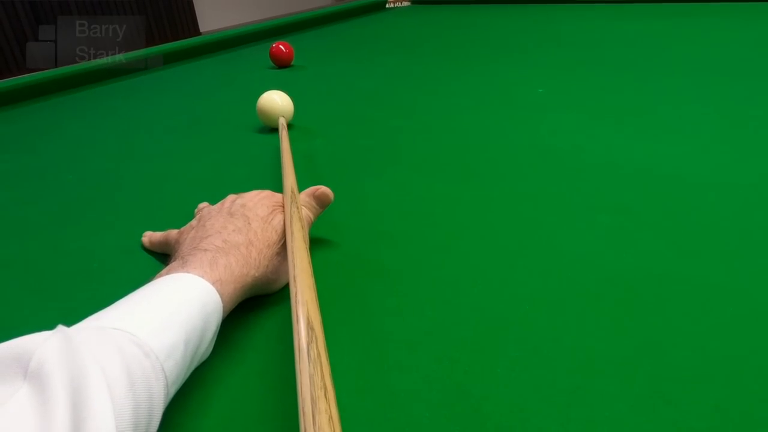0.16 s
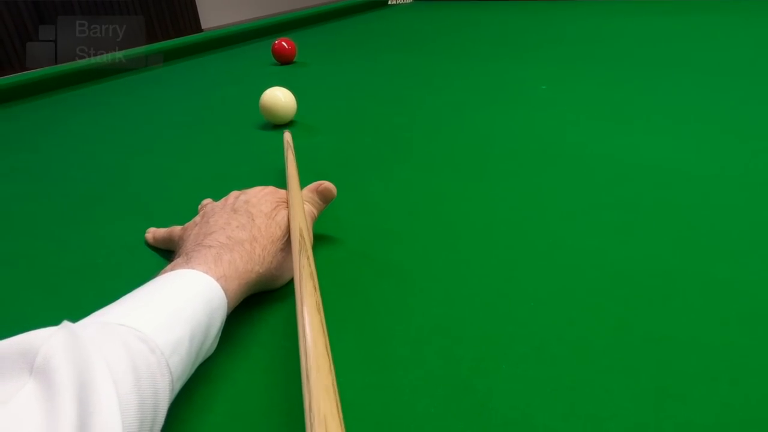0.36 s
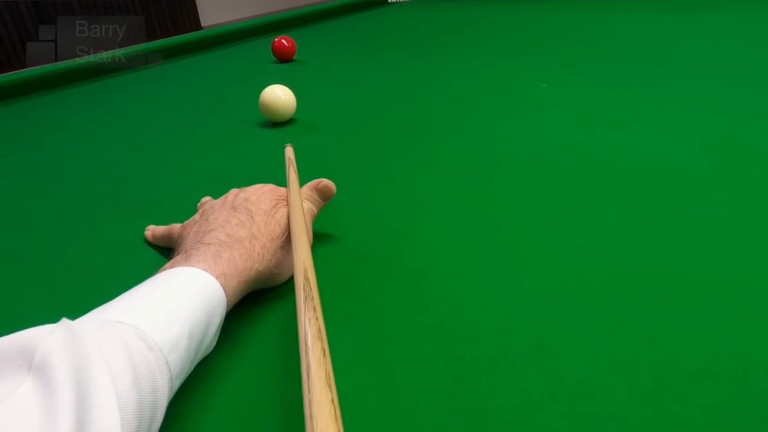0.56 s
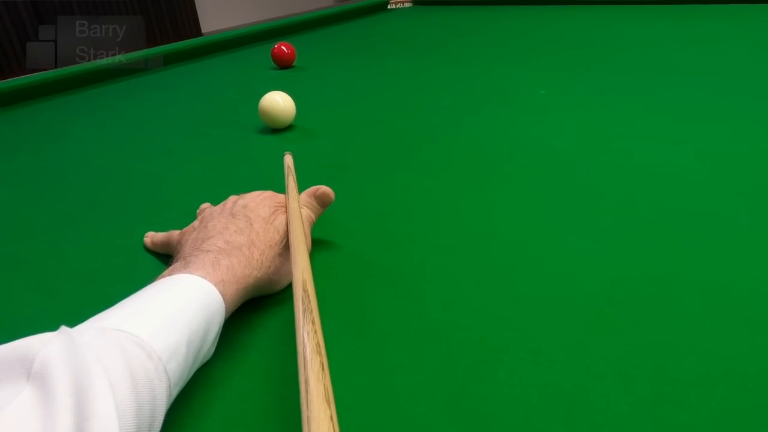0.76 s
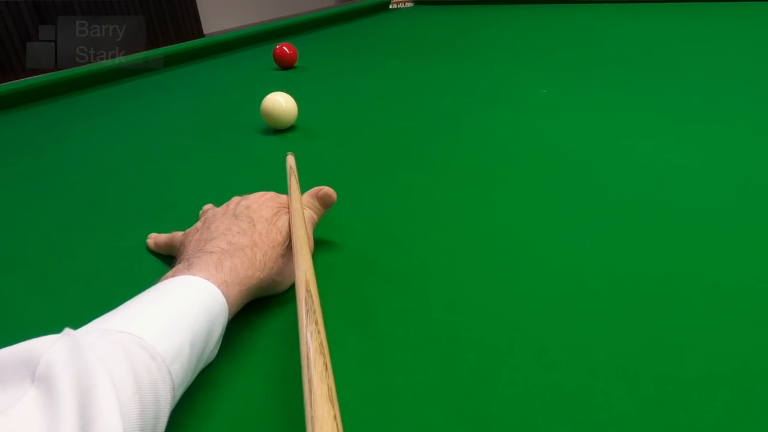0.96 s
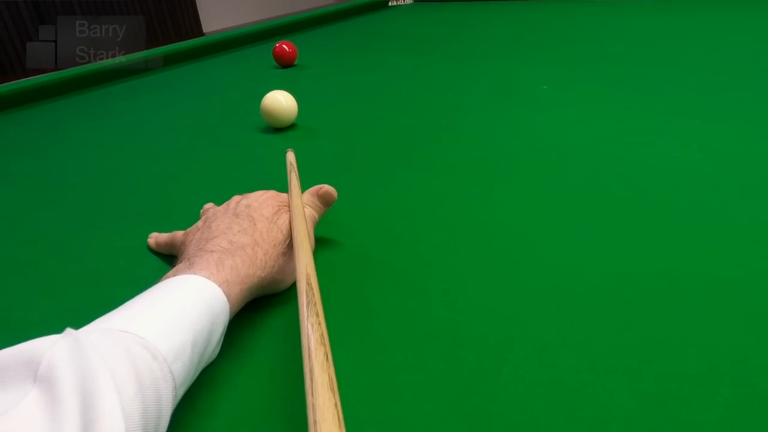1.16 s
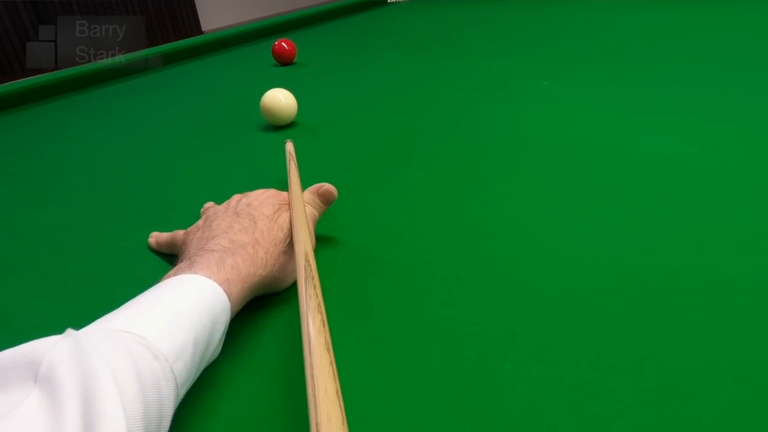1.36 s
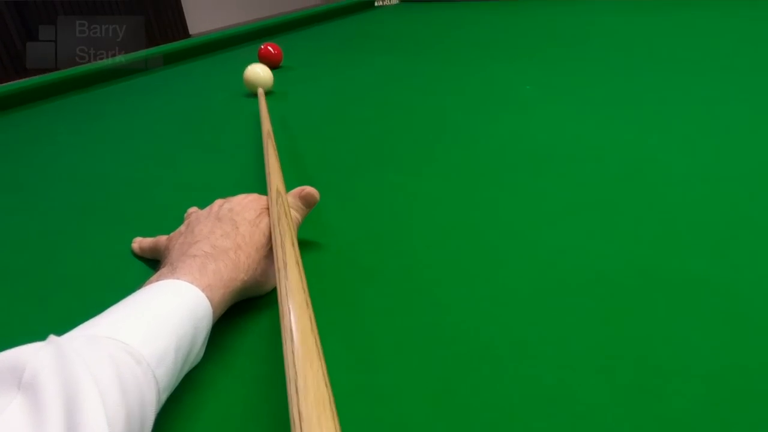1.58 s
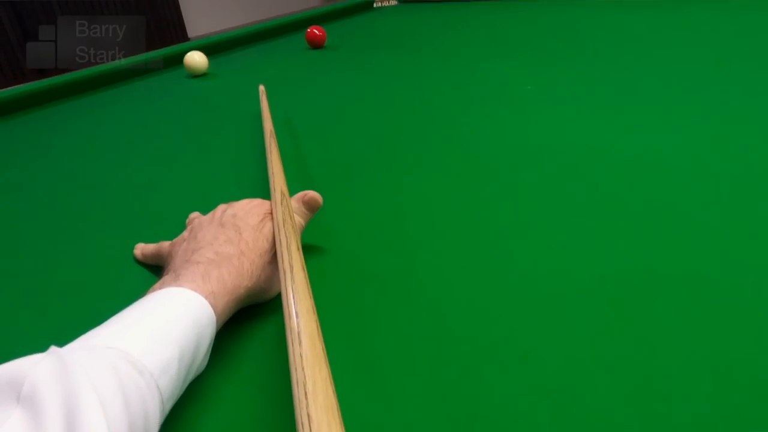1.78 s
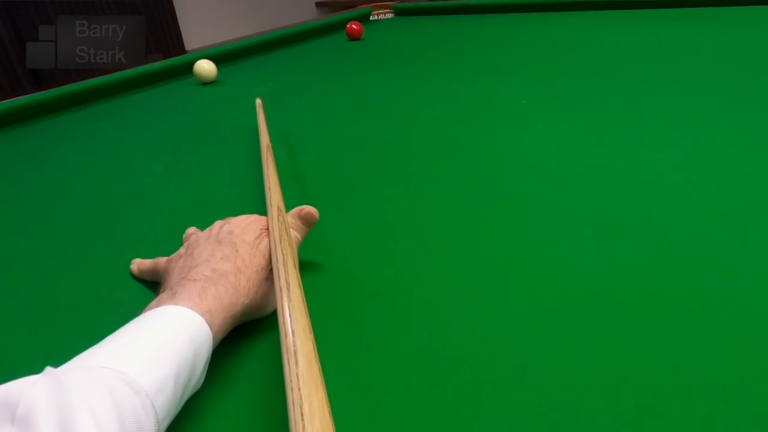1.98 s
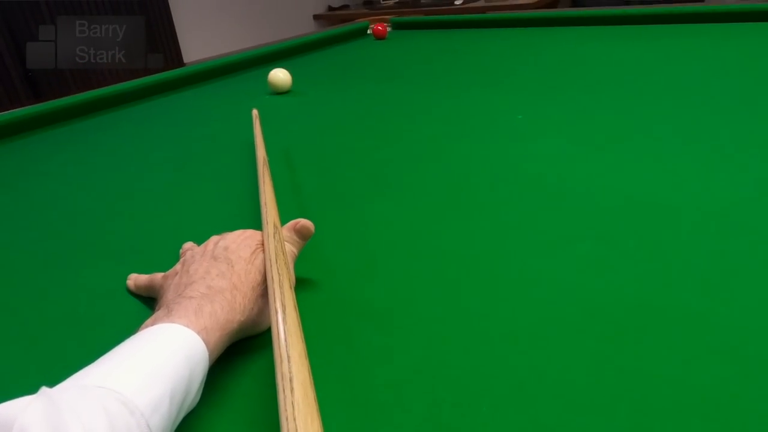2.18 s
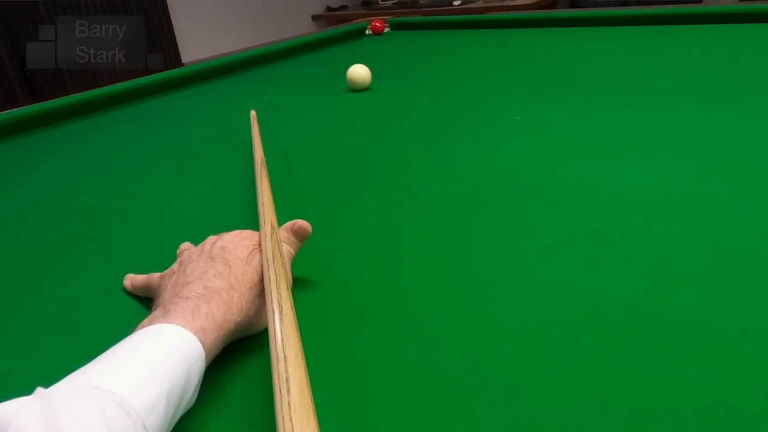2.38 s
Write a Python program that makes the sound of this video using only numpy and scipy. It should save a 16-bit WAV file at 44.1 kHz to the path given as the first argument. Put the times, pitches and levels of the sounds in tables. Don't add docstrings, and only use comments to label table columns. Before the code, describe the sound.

A snooker shot in a large, quiet room: faint ventilation and cue sliding, a woody tip strike and hand slap, then a much louder hard ball click with echoes, low rolling and a dull pocket thud, heard close.

```python
import sys
import numpy as np
from scipy import signal
from scipy.io import wavfile
from scipy.ndimage import uniform_filter1d

SR = 44100
rng = np.random.default_rng(int(sys.argv[2]) if len(sys.argv) > 2 else 0)


def dump_mix(stems):
    frames = np.atleast_2d(stems).T
    limited = np.clip(frames, -1, 1)
    pcm = np.round(limited * 32767).astype(np.int16)
    wavfile.write(sys.argv[1], SR, pcm)


def invert_db(x):
    u = np.asarray(x, float) / 20
    return 10 ** u


N = 107295
T = np.arange(N) / SR
ROOM_DELAY_S = 0.0105

# [start_s, level_db, slap_share_0_to_1, left_lag_samples]
CUE_SOUNDS = [(1.532, -64, 0.3, 0.96), (1.5418, -47, 0.3, 1.7), (1.5523, -36, 0.15, 3.8),
              (1.5629, -17.5, 0.05, 1.66), (1.5649, -32.5, 0.2, 0.74), (1.583, -53.5, 0.5, 0.5),
              (1.5927, -17, 0.84, 0.12), (1.5933, -12.5, 0.95, 0.1), (1.5955, -23, 0.8, 0.105),
              (1.6225, -35.5, 1, 0.057), (1.643, -47.5, 0.8, 0.1)]
# [start_s, level_db, ring_hz, t60_s, left_lag_samples]
BALL_CLICKS = [
    (1.71742, 4.5, 2800, .0014, 0.1),
    (1.71788, -9, 1150, .005, 0.1),
    (1.71917, 2.6, 2450, .0036, 2.2),
    (1.7194, -14, 1200, .004, 2.2),
]
# [start_s, level_db, t60_s, top_hz]
RUSTLES = [
    (1.598, -30, 0.63, 800),
    (2.202, -49.5, 0.73, 730),
    (2.387, -51.5, 0.42, 540),
]
# [start_s, dip_db]
GAIN_DIPS = [
    (1.561, -2),
    (1.593, 5),
    (1.717, 10.5),
]


def rms_one(x):
    return x / np.sqrt(np.mean(x ** 2) + 1e-20)


def at_hz(points, hz):
    points = np.array(points)
    return np.interp(np.log(hz), np.log(points[:, 0]), points[:, 1])


def butter(x, hz, kind, order=2):
    return signal.sosfilt(signal.butter(order, hz, kind, fs=SR, output="sos"), x)


def drift(rate):
    r = np.exp(-80 * np.pi * rate / SR)
    chance = rng.standard_normal(N // 40 + 2002)
    slow = signal.lfilter([1], [1, -2 * r, r * r], chance)[2000:]
    return np.interp(np.arange(N) / 40, np.arange(len(slow)), rms_one(slow))


def tap(s, lag=0.):
    out = np.full((2, N), 1e-18)
    k = np.arange(-8, 9)
    for ch, at in enumerate([s * SR + lag, s * SR]):
        out[ch, int(at) + k] = np.sinc(k - at % 1) * np.hanning(19)[1:-1]
    return out


def ring(push, hz, t60):
    r = invert_db(-60 / (t60 * SR))
    w = 2 * np.pi * hz / SR
    return signal.lfilter([0, np.sin(w)], [1, -2 * r * np.cos(w), r * r], push)


def squeeze(push, hz, t60):
    return np.diff(ring(push, hz, t60), prepend=0) * SR / (2 * np.pi * hz)


def bands(spectrum, likeness, shape):
    out, power = 0, 0
    edges = 32 * 2 ** np.arange(0, 9.3, .4)
    white = rng.standard_normal((2, 2, N))
    for k, (low, high) in enumerate(zip(edges, edges[1:])):
        mid, side = butter(white[k % 2], [low, high], "band")
        hz = np.sqrt(low * high)
        alike = np.clip(at_hz(likeness, hz), 0, .999)
        gain = invert_db(at_hz(spectrum, hz))
        power += gain ** 2 * (high - low) * 2 / SR
        stereo = np.sqrt(1 + alike) * mid + np.sqrt(1 - alike) * side * [[1], [-1]]
        out = out + gain * shape(hz) * stereo
    return out / np.sqrt(2 * power)


def duck_db():
    release_db_per_s = 66
    dips = [np.maximum(db - release_db_per_s * (T - s), 0) * (T > s) for s, db in GAIN_DIPS]
    return -uniform_filter1d(np.max(dips, axis=0), size=200)


def air():
    # [time_s, pitch_hz, level_db]
    throb_path = [(0.0, 24.9, -51), (0.13, 25.1, -51), (0.35, 24.9, -58), (0.431, 25.1, -75),
                  (0.55, 25.27, -53.5), (0.72, 24.8, -52.5), (1.001, 24.52, -63.5), (1.26, 25.4, -56.5),
                  (1.369, 24.94, -63), (1.66, 25.4, -51), (1.68, 24.9, -67), (1.77, 24.9, -45.5),
                  (1.81, 24.6, -58.5), (2.43, 24.5, -63)]
    # [pitch_hz, level_db_per_hz]
    air_colour = [(21, -27), (35, -8), (65, -23), (136, -31.5), (205, -22), (342, -29.5), (431, -36),
                  (1400, -42.5), (16000, -59)]
    # [pitch_hz, likeness_0_to_1]
    air_likeness = [(60, 0.92), (240, 0.078), (950, 0.63), (3770, 0.54), (15000, 0.886)]
    s, hz, db = np.transpose(throb_path)
    phase = 2 * np.pi * np.cumsum(np.interp(T, s, hz)) / SR
    throb = np.sqrt(2) * invert_db(np.interp(T, s, db)) * np.sin(phase - 1.0)
    noise = invert_db(-61.5) * bands(air_colour, air_likeness, lambda hz: invert_db(0.65 * drift(4.9)))
    return throb + noise * invert_db(0.4 * duck_db())


def slide():
    # [time_s, level_db, centre_hz]
    slide_path = [(0, -79, 4970), (.35, -73, 5020), (.65, -82, 5040), (.95, -73.5, 5590),
                  (1.2, -84.5, 4980), (1.45, -79.5, 4810), (1.58, -66, 5000), (1.61, -87, 5500),
                  (1.65, -62.5, 5970), (1.75, -82, 5930), (2.0, -75.5, 6210), (2.201, -72, 5820),
                  (2.288, -66.5, 5174), (2.362, -69, 4560), (2.43, -68, 5210)]
    # [multiple_of_centre, level_db]
    resonances = [(0.679, -1), (1.002, 1), (1.35, -10)]
    draw_back_s, width_hz = 2.02, 420
    s, db, hz = np.transpose(slide_path)
    phase = 2 * np.pi * np.cumsum(np.interp(T, s, hz)) / SR
    out = invert_db(-1) * rms_one(butter(rng.standard_normal(N), [3500, 9500], "band"))
    clear = np.clip((T - draw_back_s) / 0.13, .35, 1)
    for k, band_db in resonances:
        a, b = butter(rng.standard_normal((2, N)), width_hz, "low")
        hum = rms_one(a * np.cos(k * phase) + b * np.sin(k * phase))
        out = out + invert_db(band_db) * clear * hum
    return invert_db(np.interp(T, s, db) + 1.34 * drift(9.8)) * out


def ticks():
    # [start_s, level_db, pitch_hz, t60_s]
    tick_list = [
        (0.106, -52, 3680, 0.015),
        (.17, -59.5, 810, 0.023),
        (.542, -59, 750, 0.015),
        (2.2035, -52, 1400, 0.02),
        (.316, -60, 420, .03),
        (1.5828, -50, 6500, 0.004),
    ]
    out = 0
    for s, db, hz, t60 in tick_list:
        out = out + invert_db(db + 0.5) * butter(ring(tap(s), hz, t60), [hz / 1.2, hz * 1.18], "band")
    return out


def thrust():
    # [pitch_hz, level_db]
    sing_modes = [(4490, -85), (5050, -85), (5560, -89), (7870, -94), (8570, -89)]
    start_s, rise_s, t60_s = 1.37, 0.1, 0.02
    sing = sum(invert_db(db) * rms_one(ring(rng.standard_normal(N), hz, t60_s)) for hz, db in sing_modes)
    return sing * np.clip((T - start_s) / rise_s, 0, 1) * (T < CUE_SOUNDS[3][0])


def cue():
    # [pitch_hz, tip_strike_db, slap_db, t60_s]
    shaft_modes = [(172, 2.5, -43, 0.026), (235.5, -15, -27, 0.36), (654, -5.5, 6.5, 0.012),
                   (872.6, -7.5, 4.5, 0.037), (1168, 4, -6.5, 0.035), (1625, -10, -31, 0.067),
                   (1985, -15, -12.5, 0.031), (2368, 7.5, -5, 0.024), (2610, -8.5, -5.5, 0.067),
                   (2903, 6, -21.5, 0.021), (3392, -0.5, -9, 0.038), (3886, 0.5, -4.5, 0.025),
                   (4570, 1, -27.5, 0.026), (4917, -5, -18.5, 0.02)]
    crack_db, crack_s, crack_low_hz, slap_crack_db = -16, 0.0028, 4430, -4
    taps = [tap(s, lag) for s, _, _, lag in CUE_SOUNDS]
    out = np.zeros((2, N))
    for k, (hz, tip_db, slap_db, t60) in enumerate(shaft_modes):
        drive = 0
        for contact, (_, db, share, _) in zip(taps, CUE_SOUNDS):
            drive = drive + contact * invert_db(db + tip_db + share * (slap_db - tip_db))
        out += ring(drive, hz, t60) * (-1) ** k
    sparks = sum(np.abs(tap(s)) * invert_db(db + share * slap_crack_db) for s, db, share, _ in CUE_SOUNDS[3:])
    burst = signal.lfilter([1], [1, -np.exp(-1 / (crack_s * SR))], sparks)
    grit = rng.standard_normal(N) + 0.47 * rng.standard_normal((2, N))
    crack = butter(butter(burst * grit, crack_low_hz, "high"), 7270, "low", order=3)
    return butter(out, 8100, "low") + invert_db(crack_db) * crack


def hit_tail():
    # [start_s, tail_start_db]
    heard_hits = [
        (1.561, -41.5),
        (1.594, -52),
        (1.719, -22),
    ]
    # [pitch_hz, t60_s]
    room_decay = [(150, 0.99), (600, 0.64), (1500, 0.71), (3000, 0.77), (5000, 0.29), (9000, .3)]
    # [pitch_hz, level_db_per_hz]
    room_colour = [(200, -11), (500, -6), (900, -1.5), (1500, 8), (2400, 8.5), (3500, 4), (4500, -43),
                   (6000, -43)]
    # [pitch_hz, likeness_0_to_1]
    room_likeness = [(60, 0.66), (240, 1), (950, 0.9), (3770, 0.3), (15000, 0.76)]
    rise_s, pan_db, airy_db, airy_t60_s = 0.0018, 1.24, -56, 0.4
    ages = [(np.maximum(T - s - ROOM_DELAY_S, 0), db) for s, db in heard_hits]

    def tail(hz):
        t60 = at_hz(room_decay, hz)
        return sum((1 - np.exp(-a / rise_s)) * invert_db(db - 60 * a / t60) for a, db in ages)

    clack = butter(bands(room_colour, room_likeness, tail), 4010, "low", order=4)
    clack = clack * invert_db([[pan_db], [-pan_db]]) * invert_db(0.82 * drift(66.7))
    late = ages[-1][0]
    airy = rms_one(butter(butter(rng.standard_normal(N), 8450, "low", order=1), 4500, "high"))
    fade = invert_db(airy_db - 60 * late / airy_t60_s) * (late > 0)
    return clack + fade * airy * invert_db(2.0 * drift(39.7))


def room(shaft):
    cue_db, cue_t60_s, cue_top_hz = -11, 0.69, 4260
    age = np.maximum(T[:SR] - ROOM_DELAY_S, 0)
    echoes = rng.standard_normal(SR) + 0.13 * rng.standard_normal((2, SR))
    echoes = echoes * invert_db(-60 * age / cue_t60_s) * (age > 0)
    echoes = echoes / np.sqrt(np.sum(echoes ** 2) / 2)
    dull_cue = butter(shaft, cue_top_hz, "low", order=3)
    cue_tail = signal.fftconvolve(dull_cue, echoes, axes=1)[:, :N]
    return (hit_tail() + invert_db(cue_db) * cue_tail) * invert_db(duck_db())


def thuds():
    # [pitch_hz, level_db, t60_s]
    frame_modes = [(57.1, -4, 0.16), (88.3, -9, 0.12), (136.1, -9.5, 0.29), (175.3, -7.5, 0.17),
                   (224.7, -3.5, 0.16), (330, -5.5, 0.056), (463.4, -6, 0.049), (644, -12.5, 0.067)]
    # [start_s, level_db, softness_hz]
    blows = [(1.565, -22.5, 500), (1.592, -27.5, 500), (1.628, -31.5, 403), (1.738, -30.5, 302),
             (1.799, -34, 205), (1.891, -30.5, 125), (1.946, -28, 154), (1.976, -28.5, 194),
             (2.007, -51, 200), (2.051, -38.5, 280), (2.092, -40, 271), (2.2091, -37, 596),
             (2.251, -43, 404), (2.28, -41.5, 400), (2.322, -40, 302), (2.385, -40, 280),
             (2.399, -37.5, 240)]
    luck_db = rng.normal(0, 2.5, (len(blows), len(frame_modes)))
    luck_db[np.array(blows)[:, 0] > RUSTLES[1][0], :2] += -6.5
    pushes = [butter(tap(s)[0], soft_hz, "low") * invert_db(db) for s, db, soft_hz in blows]
    out = 0
    for k, (hz, db, t60) in enumerate(frame_modes):
        drive = sum(p * invert_db(g) for p, g in zip(pushes, luck_db[:, k]))
        out = out + ring(drive, hz, t60) * invert_db(db) * (-1) ** k
    return out


def knocks():
    # [start_s, level_db, pitch_hz, t60_s]
    knock_list = [(2.208, -36, 190, 0.14), (2.25, -39.5, 196.5, 0.28), (2.386, -33.5, 175, 0.23),
                  (1.626, -27.5, 221, 0.35), (1.6, -37.5, 221, 1), (1.88, -40.5, 221, 0.4),
                  (1.596, -36, 95, 0.47), (2.4, -38.5, 110, 0.54), (1.6, -38, 135, 0.3),
                  (1.955, -41, 54.4, 0.61), (2.21, -48, 490, 0.43), (2.209, -49, 740, 0.15),
                  (2.30, -50.5, 460, 0.28), (2.0, -39.5, 175, 0.3)]
    return sum(invert_db(db) * butter(ring(tap(s)[0], hz, t60), 2 * hz, "low") for s, db, hz, t60 in knock_list)


def rustle():
    out = 0
    for s, db, t60, top_hz in RUSTLES:
        age = np.maximum(T - s, 0)
        noise = rms_one(butter(butter(rng.standard_normal(N), top_hz, "low"), 130.3, "high"))
        out = out + noise * invert_db(db - 60 * age / t60) * (1 - np.exp(-age / 0.0021))
    return out


def rolling():
    start_s, start_db, loss_db_per_s, top_hz = 1.637, -37, 29.5, 222
    rumble = rms_one(butter(butter(rng.standard_normal(N), top_hz, "low"), 50, "high"))
    rumble = rumble * invert_db(1.2 * drift(15))
    fade_in = np.clip((T - start_s) / 0.0573, 0, 1)
    return rumble * invert_db(start_db - loss_db_per_s * (T - start_s)) * fade_in


def frame():
    out = thuds() + knocks() + rolling() + rustle()
    late = np.roll(butter(out, 240, "high", order=1), 300)
    return butter(out + 0.088 * late * np.array([[1], [-1]]), 30, "high")


def shaking():
    # [start_s, level_db, t60_s]
    late_rings = [(1.628, -31, 0.22), (1.60, -45.5, 1), (1.62, -41.5, 0.86), (1.60, -44, 0.39),
                  (1.605, -49.5, 0.96), (1.605, -35.5, 0.5), (1.64, -52, 0.6), (1.64, -44.5, 0.6),
                  (1.61, -60, 0.4), (1.66, -41.5, 0.56), (1.67, -40.5, 0.406), (1.615, -35, 0.15)]
    late_pitches = [2360, 2945, 2680, 1990, 3850, 1150, 3385, 1372, 4540, 980, 2360, 885]
    shake_t60_s, pan_db = 0.2, 1.1
    count = len(late_rings)
    shake = rng.standard_normal((count, 1, N)) + 0.6 * rng.standard_normal((count, 1, N)) * [[1], [-1]]
    out = 0
    for push, hz, (s, db, t60) in zip(shake, late_pitches, late_rings):
        fade = invert_db(-60 * np.maximum(T - s, 0) / t60) * np.clip((T - s) / 0.0036, 0, 1)
        out = out + invert_db(db) * rms_one(ring(push, hz, shake_t60_s)) * fade
    return out * (T < GAIN_DIPS[-1][0]) * invert_db([[pan_db], [-pan_db]])


def skid():
    middle_s, spread_s, skid_db = 1.648, 0.026, -65
    hiss = rms_one(butter(rng.standard_normal(N), [4800, 8500], "band", order=1))
    return invert_db(skid_db) * hiss * np.exp(-.5 * ((T - middle_s) / spread_s) ** 2)


def balls():
    click_db, soft_hz, snap_db, snap_pan_db = 0.27, 3270, -19, -1.5
    click = sum(invert_db(db) * squeeze(tap(s, lag), hz, t60) for s, db, hz, t60, lag in BALL_CLICKS)
    click = butter(butter(click, soft_hz, "low"), 6480, "low", order=1)
    snap = butter(sum(tap(s, lag) for s, _, _, _, lag in BALL_CLICKS[::2]), 7000, "high")
    return invert_db(click_db) * click + snap * invert_db(snap_db) * invert_db([[snap_pan_db], [-snap_pan_db]])


def walls():
    # [start_s, level_db, left_lag_samples]
    wall_echoes = [(1.7236, -24.5, 1.5), (1.7268, -23, 0), (1.7312, -24, 1), (1.7345, -18, -6),
                   (1.7383, -17, 4), (1.7405, -17, 3), (1.7425, -15, -2.0), (1.7447, -23, 3.5)]
    _, db, hz, t60, _ = BALL_CLICKS[0]
    back = sum(tap(s, lag) * invert_db(echo_db) * (-1) ** k for k, (s, echo_db, lag) in enumerate(wall_echoes))
    dull = 0.81 * squeeze(back, 0.81 * hz, 1.7 * t60)
    return invert_db(db) * butter(dull, 3900, "low", order=5)


def scene():
    shaft = cue()
    before = air() + slide() + ticks() + thrust()
    strike = shaft + room(shaft) + frame() + shaking()
    return before + strike + skid() + balls() + walls()


def low_pass(x):
    return signal.sosfilt(signal.butter(12, 16540, fs=SR, output="sos"), x)


def record(dry):
    top_cut = signal.cheby2(12, 70, 16600, fs=SR, output="sos")
    mix = signal.sosfilt(top_cut, dry)
    return low_pass(mix)


dry = scene()
out = record(dry)
dump_mix(out)
```